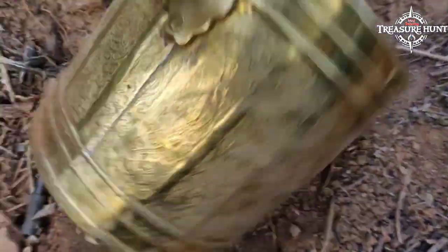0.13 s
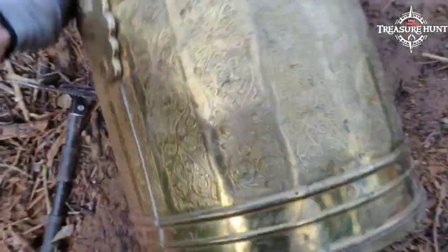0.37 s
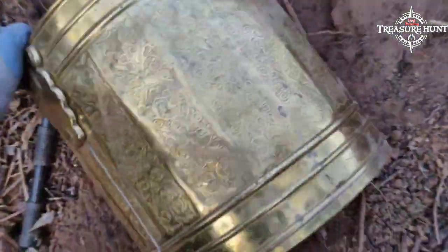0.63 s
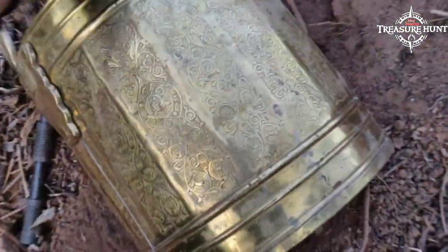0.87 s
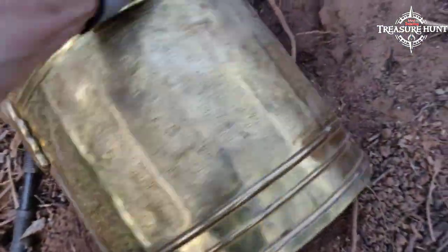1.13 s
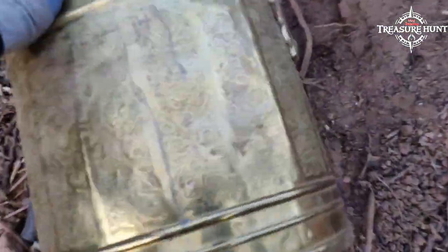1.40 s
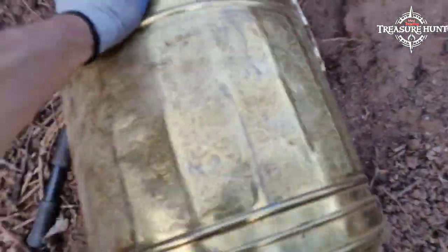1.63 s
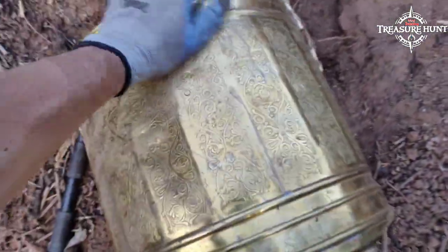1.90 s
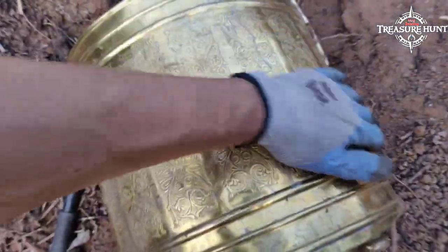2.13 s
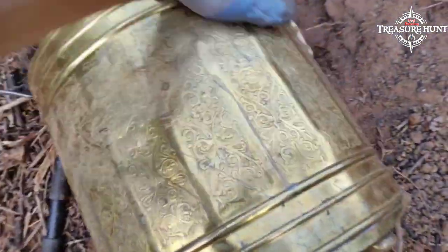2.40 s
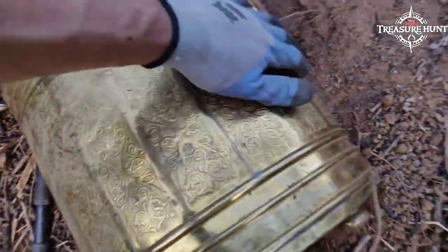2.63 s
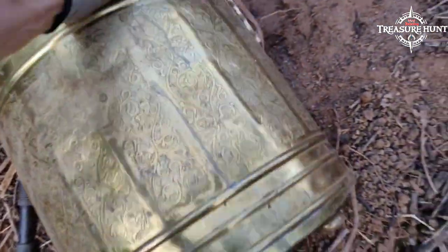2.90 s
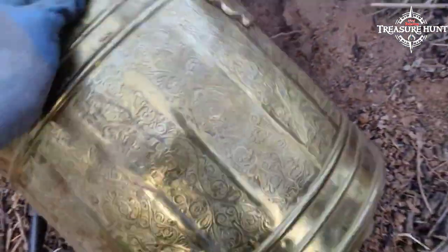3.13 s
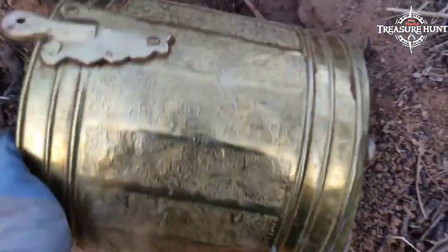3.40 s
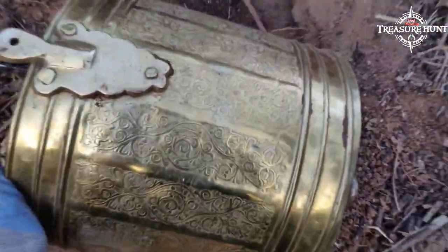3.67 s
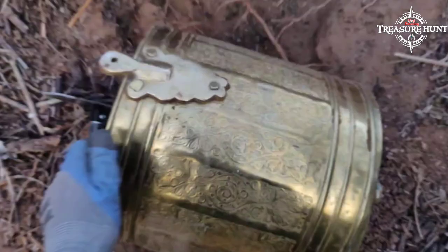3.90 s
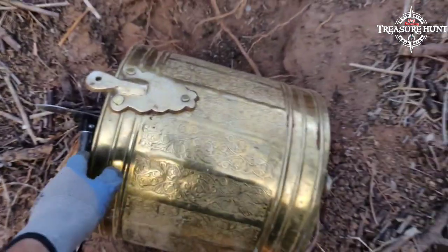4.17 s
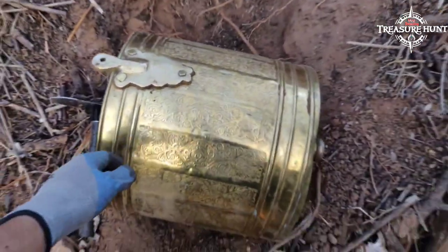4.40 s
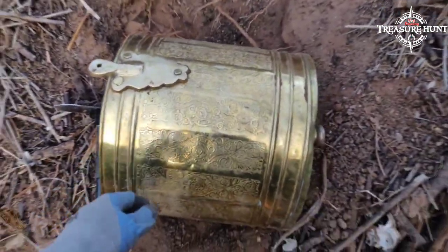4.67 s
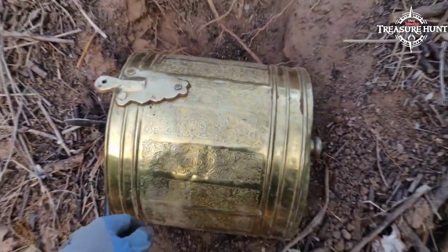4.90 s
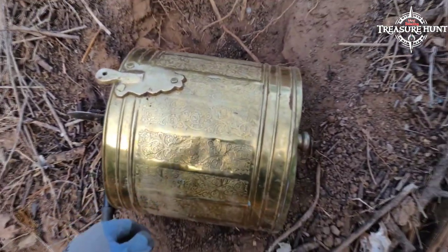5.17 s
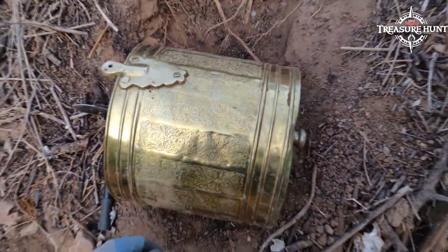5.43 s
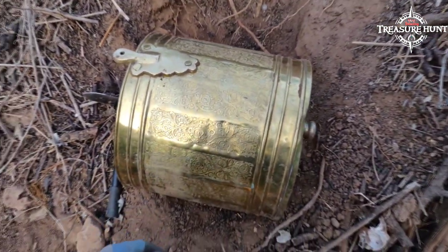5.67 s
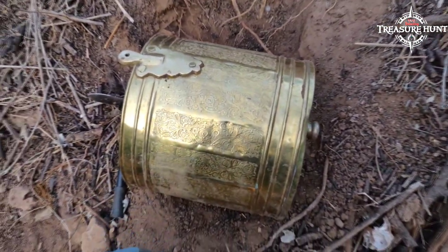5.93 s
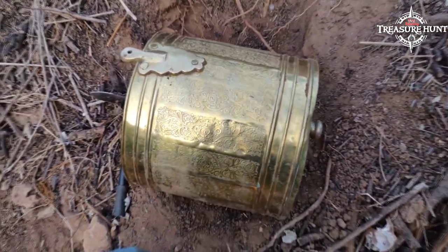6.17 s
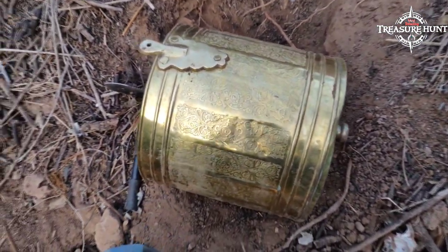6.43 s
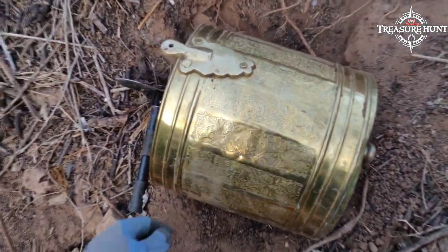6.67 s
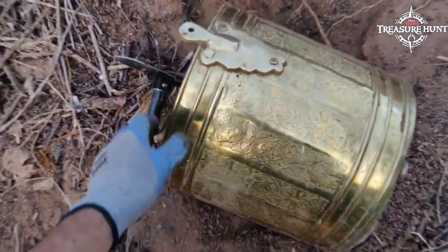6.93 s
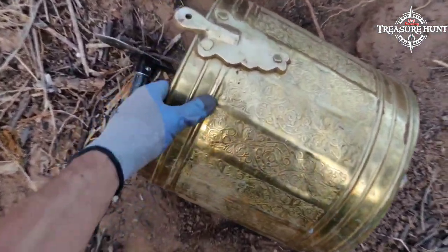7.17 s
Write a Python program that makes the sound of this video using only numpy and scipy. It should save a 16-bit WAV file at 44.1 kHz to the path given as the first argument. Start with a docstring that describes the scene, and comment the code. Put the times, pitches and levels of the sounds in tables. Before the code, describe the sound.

Hollow metal clunks, gritty scraping and glove rubs with wind thumps, fading after four seconds to soft distant rushing and tiny litter ticks.

```python
"""A distant rush of water or leaves goes on to the left, heard by a two-port microphone close to the action.
From the start gloved hands roll a hollow brass drum over dry, gritty, twiggy ground: grit and knocks ring its modes,
hardest near 0.7 and 1.5 s, while the glove hisses over the embossing, twigs snap and gusts thump the ports.
After a lull near 2.2 s it rocks and knocks again, single wall modes singing out between 3 and 3.5 s.
From about 4.5 s the rush and ticking litter are left, with a few faint knocks and snaps."""
import sys
import numpy as np
from scipy import signal
from scipy.fft import rfft, irfft
from scipy.io import wavfile
from scipy.ndimage import uniform_filter1d, minimum_filter1d

SR = 44100
rng = np.random.default_rng(int(sys.argv[2]) if len(sys.argv) > 2 else 0)


def dump_mix(stems):
    """Bounce the given channels to the path in sys.argv[1] as a 16-bit WAV at rate SR."""
    frames = np.atleast_2d(stems).T  # one column per channel
    limited = np.clip(frames, -1, 1)  # hard clip at full scale
    pcm = np.round(limited * 32767).astype(np.int16)
    wavfile.write(sys.argv[1], SR, pcm)


def undo_db(level):
    """Turn decibels back into plain size, where 20 dB means ten times bigger."""
    steps = np.asarray(level, float) / 20
    return 10 ** steps


N = 322371
T = np.arange(N) / SR  # time in seconds
MS = np.arange(0, N / SR + .002, .001)  # a grid of milliseconds, in seconds
PORTS = np.array([[1], [-1]])  # left, right

# The shell moves as body, wall and rim. Each row: lowest mode in Hz, highest mode in Hz,
# level in dB (against the strong modes) and t60 in seconds of the many faint modes between the strong ones.
PARTS = [(161, 466, -0.5, 0.11), (456, 1395, -2.5, 0.14), (1190, 4000, 12, 0.79)]
# Knocks on the shell. Each row: start in seconds, wall peak in dB, rim above wall in dB,
# favoured pitch in Hz, t60 in seconds of the damping by the grip.
KNOCKS = [(0.226, -27, -1.5, 623, 0.25), (0.62, -21.5, -29, 643, 0.67), (0.661, -11.5, 4.5, 1230, 0.28),
          (0.677, -4, -27, 644, 0.15), (0.923, -30.5, 7.5, 600, 1), (1.287, -40.5, 9.5, 690, 0.4),
          (1.454, -9.5, -7.5, 724, 0.57), (1.501, 1.5, -9, 713.5, 0.36), (1.512, -11, -8, 729, 0.43),
          (1.54, -5.5, -36, 790, 0.4), (1.817, -22, -11, 724, 0.63), (2.169, -32, -1, 910, 1),
          (2.547, -35.5, 4, 886, .2), (2.572, -23.5, -13, 503, 0.36), (2.638, -23, -8, 753, 0.15),
          (2.892, -37, 4, 670, 0.33), (2.944, -38, 2.5, 900, 0.14), (3.018, -24, -17, 556, 0.6),
          (3.052, -17, -7, 700, 0.11), (3.082, -15.5, -9, 704, 0.58), (3.123, -34, -26, 713, 0.33),
          (3.354, -13, -5, 1100, 0.9), (3.39, -13.5, -7.5, 947, 0.16), (3.409, -13.5, -23, 996, 0.48),
          (3.463, -20.5, -28, 980, 0.44), (3.515, -23, -17, 500, 0.62), (4.21, -39, -5, 597, 0.36),
          (4.597, -45, -18, 504, 0.29), (6.434, -45.5, -3, 452, 0.4), (6.611, -40, -19, 646, 0.4),
          (6.725, -40.5, -22, 556, 0.53), (7.165, -45, -12, 463, 0.4)]


def unit(x):
    """Scale to rms 1."""
    return x / np.sqrt(np.mean(x ** 2))


def along(table, hz):
    """Read (Hz, value) points on a log-frequency axis."""
    points, values = np.transpose(table)
    return np.interp(np.log(hz + 1), np.log(points), values)


def colour(x, spectrum):
    """Filter by a (Hz, dB) spectrum; white noise of rms 1 keeps rms 1."""
    gain = undo_db(along(spectrum, np.fft.rfftfreq(N, 1 / SR)))
    return irfft(rfft(x) * unit(gain), N)


def band(x, lo_hz, hi_hz):
    """Steep causal band-pass that leans towards its low edge, as soft contacts do."""
    steep = signal.butter(3, [lo_hz, hi_hz], "band", fs=SR, output="sos")
    lean = signal.butter(1, 1400., fs=SR, output="sos")
    return signal.sosfilt(np.vstack([steep, lean]), x)


def scatter(count, lo_hz):
    """Noise at both ports, less alike at higher pitch."""
    mid, side = rng.standard_normal((2, count))
    return mid + min(lo_hz / 670.0, 1) * side * PORTS


def walk(rate):
    """Random levels held 1 / rate seconds and slewed twice; rms 1."""
    k = int(SR / rate)
    held = np.repeat(rng.standard_normal(N // k + 1), k)
    slewed = uniform_filter1d(uniform_filter1d(held, k), k)
    return unit(slewed[:N])


def grains(spread_db, channels):
    """Noise whose samples have long-tailed sizes: grit cracking; rms 1."""
    return unit(rng.standard_normal((channels, N)) * undo_db(spread_db * rng.exponential(size=N)))


def bursts(times, peak_db, t60):
    """Envelope that jumps at each time and dies away."""
    out = np.zeros(N)
    for s, db, fall in zip(times, peak_db, t60):
        span = slice(int(s * SR), int((s + .3) * SR))
        out[span] += undo_db(db - 60 * (T[span] - s) / max(fall, .001))
    return out


def pan(x, db):
    """Share between the ports by a left-minus-right level."""
    return x * undo_db(np.array([db, -db]).reshape(2, -1) / 2)


def swells(full, db, rise, hold, fall):
    """Power of each event every millisecond: up to its level at full, hold, fall; slopes in s per 20 dB, at least 3 ms."""
    full, db, rise, hold, fall = (np.reshape(v, (-1, 1)) for v in (full, db, rise, hold, fall))
    before = (full - MS) / np.maximum(rise, .003)
    after = (MS - full - hold) / np.maximum(fall, .003)
    away = np.maximum(before, after)
    return undo_db(db - 20 * np.clip(away, 0, 8)) ** 2


def total(power, lag=0.):
    """Joint gain of events over time."""
    return np.interp(T - lag, MS, np.sqrt(power.sum(axis=0)))


def blend(power, values):
    """A value of each event, led by whichever is loudest."""
    return np.interp(T, MS, values @ power / power.sum(axis=0))


def rush():
    """Far rushing: noise partly common to the ports, left first, its level flickering more below 900 Hz."""
    # Each row: Hz, relative level in dB per Hz.
    rush_spectrum = [(53, -35), (90, -19), (209, -10), (243, -6.5), (295, -7.5), (343, -2), (426, 0.5),
                     (907, -2.5), (1080, -5), (2250, -12), (3610, -20.5), (6910, -22.5), (8760, -31.5),
                     (14700, -32.5), (15700, -31)]
    # Each row: Hz, share of the power common to both ports.
    alike = [(60, 0.41), (300, 1), (1000, 0.66), (3000, 0.083), (6000, 0.1), (12000, .1)]
    hz = np.fft.rfftfreq(N, 1 / SR)
    share = np.clip(along(alike, hz), 0, 1)
    common, left, right = rfft(rng.standard_normal((3, N)))
    lag = np.exp(-2j * np.pi * hz * 0.00039)  # the right port hears it 0.39 ms later
    together = np.sqrt(share) * common * np.array([lag ** 0, lag])
    apart = np.sqrt(1 - share) * np.array([left, right])
    both = (together + apart) * undo_db(along(rush_spectrum, hz))
    out = 0
    for centre_hz in 60 * 2 ** np.arange(0, 8.5, .5):
        # overlapping bands, half an octave to either side
        weight = np.clip(1 - np.abs(np.log2(hz / centre_hz + 1e-9)) * 2, 0, 1)
        flicker_db = 2.5 if centre_hz < 900 else 1.
        out = out + irfft(both * weight, N) * undo_db(flicker_db * walk(24))
    return unit(out) * undo_db(-49 + .6 * walk(3))


def litter():
    """Dry litter settles all around in faint dull ticks: random hits with short tails of band-passed noise."""
    ticks_per_s, tick_db, t60_s = 19, -51, 0.033
    hits = (rng.random(N) < ticks_per_s / SR) * undo_db(tick_db + 1.5 * rng.standard_normal(N))
    tail = signal.lfilter([1], [1, -undo_db(-60 / (t60_s * SR))], hits)
    return tail * unit(band(scatter(N, 640.0), 1100.0, 3200.0))


def slap():
    """Air slaps mostly one port at a time: each a brief swing of its membrane."""
    # Each row: time in seconds half a swing before the middle, peak in dB (about the mean of the ports),
    # length of a swing in seconds, left minus right in dB.
    slaps = [(0.713, -28, 0.013, 24), (0.802, -11.5, 0.0087, 24), (1.015, -30, 0.019, 22),
             (1.435, -23, 0.012, 24), (1.451, -15.5, 0.0094, 24), (2.468, -33.5, 0.009, 24),
             (2.75, -32, 0.01, -24), (2.834, -15, 0.0082, 15), (2.871, -16, 0.011, 17),
             (3.114, -19, 0.013, 22), (3.139, -12, 0.007, 28), (3.148, -22, 0.0059, -27),
             (3.165, -14, 0.0084, 24), (3.17, -14, 0.0072, -24), (3.18, -14.5, 0.0107, -24),
             (3.194, -14, 0.0072, 24), (3.23, -16, 0.0113, 24), (3.276, -25, 0.012, 9),
             (3.519, -31, 0.016, 24), (4.172, -35, 0.0096, -24), (4.182, -33, 0.01, -26),
             (4.211, -31, 0.0078, -26), (4.238, -45, 0.0103, -24), (4.253, -35, 0.015, -7)]
    out = np.zeros((2, N))
    for s, db, length, side_db in slaps:
        span = slice(int((s - .04) * SR), int((s + .06) * SR))
        u = (T[span] - s) / length - .5
        swing = -undo_db(db) * np.cos(2 * np.pi * u + 0.33) * np.exp(-(u / 0.41) ** 2)
        share = 2 / (1 + undo_db(-side_db * PORTS))
        out[:, span] += np.sign(-side_db) * swing * share  # the favoured port sets the polarity
    return out


def wind():
    """Gusts thump the ports: low fluttering rumble, its noise unrelated at the two, that veers from side to side."""
    # Each row: Hz, relative level in dB per Hz.
    gust_spectrum = [(10, 4), (25, -11), (60, -6.5), (100, -16), (180, -14.5), (350, -63.5)]
    # Each row: time full level is reached, in seconds, level in dB, hold in seconds, fall in seconds per 20 dB,
    # left minus right in dB.
    gusts = [(0.0, -55, .01, 0.39, 10), (0.53, -57, .01, 0.155, -9), (0.664, -40, 0.13, .05, 1),
             (0.83, -38, 0.24, 0.16, 7), (1.3, -52, .05, .2, 3), (1.59, -38, 0.011, 0.49, 2),
             (2.44, -48, 0.068, 0.052, 16), (2.723, -43.5, 0.12, .1, -14), (2.83, -39.5, 0.12, 0.088, 13),
             (3.14, -36, 0.15, .1, 8), (3.38, -46.5, 0.28, .25, -9), (4.047, -51.5, .01, .1, -11),
             (4.14, -50.5, 0.15, 0.085, -12)]
    calm_db, calm_pan_db, veer_db = -60.5, -7, 10.5
    full, db, hold, fall, pan_db = np.transpose(gusts)
    calm = undo_db(calm_db) ** 2 + 0 * MS
    power = np.vstack([swells(full, db, 0.82 * fall, hold, fall), calm])
    side_db = blend(power, np.append(pan_db, calm_pan_db)) + veer_db * walk(6.8)
    flutter_db = 3.5 * np.array([walk(25), walk(25)])
    rumble = colour(rng.standard_normal((2, N)), gust_spectrum)
    return pan(rumble * total(power) * undo_db(flutter_db), side_db)


def wipe():
    """Glove and litter stroke the metal in dense scratches, with sharper snaps of twigs and grit on top."""
    # Each row: Hz, relative level in dB per Hz; the hiss, then the higher fizz.
    hiss_spectrum = [(2500, 0.5), (4000, -6), (5000, -2.5), (7000, -1.5), (8200, -6), (9500, -21),
                     (11000, -35.5)]
    fizz_spectrum = [(8000, -11), (10000, -7.5), (12500, -2), (14500, 3), (15700, -3.5)]
    # Strokes. Each row: time full level is reached, in seconds, hiss in dB, hold in seconds,
    # fall in seconds per 20 dB, left minus right in dB.
    strokes = [(0.0, -62, .01, .2, -3), (0.218, -54, 0.0092, .25, 3), (0.443, -51, 0.066, 0.083, .3),
               (0.574, -53, .05, .1, 3), (0.666, -26.5, .003, 0.039, 3.3), (0.713, -44.5, .1, .06, 0.5),
               (0.857, -42.5, 0.009, 0.035, -1), (0.933, -47, 0.022, .03, 1), (1.025, -57, 0.15, 0.52, 0),
               (1.33, -49.5, 0.033, 0.14, 1.5), (1.427, -43.5, 0.098, 0.056, -1.5),
               (1.6, -57.5, 0.27, 0.13, 0), (2.111, -48, .19, 0.18, 0), (2.473, -43.5, 0.079, 0.076, 1),
               (2.69, -48, 0.073, 0.088, 0.5), (2.869, -44.5, 0.054, 0.061, 0.5),
               (3.16, -52.5, 0.021, 0.4, 2), (3.35, -49.5, 0.084, 0.13, 1), (3.522, -36, 0.023, 0.041, 2.5),
               (3.594, -54, .12, .1, 1), (3.761, -45.5, .003, 0.053, 0), (3.814, -52, 0.081, 0.26, -0.5),
               (4.093, -63, .01, 0.53, -2)]
    # Twigs and grit. Each row: start in seconds, rough hiss peak in dB, fizz rms at the onset in dB, t60 in seconds.
    snaps = [(0.3591, -39, -56, 0.03), (0.6479, -27, -46, 0.056), (0.661, -31, -32, 0.046),
             (0.9207, -32, -50, 0.036), (1.052, -36, -83, 0.02), (1.1757, -38, -63, 0.03),
             (1.456, -21, -58, 0.036), (1.6097, -33, -49, 0.027), (1.8657, -42, -56, 0.037),
             (2.836, -55, -52.5, 0.019), (3.176, -35, -61, 0.033), (3.3538, -39, -55, 0.035),
             (3.5014, -42, -54, 0.03), (3.5159, -27, -46, 0.067), (3.6755, -41, -47, 0.06),
             (3.7264, -44, -44, 0.033), (3.745, -48, -40, 0.065), (3.8404, -43, -47, 0.15),
             (3.926, -40, -62.5, 0.036), (4.0881, -42, -69, 0.034), (4.148, -38.5, -75, 0.057),
             (4.5471, -50, -75, 0.03), (4.7346, -44, -67, 0.03), (5.7993, -37, -72, 0.024),
             (7.132, -39, -70, 0.033)]
    full, db, hold, fall, pan_db = np.transpose(strokes)
    power = swells(full, db, 0.77 * fall, hold, fall)
    brush = total(power) * undo_db(1.8 * walk(15))
    scratch = grains(1.1, channels=2)
    # each port also hears the other's scratches, faint and one sample late
    scratch = unit(scratch + 0.11 * np.roll(scratch[::-1], 1, axis=1))
    s, snap_db, snap_fizz_db, t60 = np.transpose(snaps)
    snap_rms_db = snap_db - 20 * np.log10(3)  # noise peaks at about three times its rms
    hiss = (brush + bursts(s, snap_rms_db, t60)) * colour(scratch, hiss_spectrum)
    fizz = (brush * undo_db(-8.5) + bursts(s, snap_fizz_db, t60)) * colour(scratch, fizz_spectrum)
    return pan(hiss + fizz, blend(power, pan_db))


def rolling():
    """Gains of body, wall and rim while the shell rolls; the body answers later, and more to dull contact."""
    # Rolls over grit. Each row: time of the peak, in seconds, wall drive in dB, rise and fall in seconds per 20 dB,
    # rim above wall in dB.
    rolls = [(0.0, -49, .1, 0.46, -9), (0.22, -37.5, 0.13, .25, -2.5), (0.46, -43, 0.5, 0.65, 2),
             (0.678, -17, 0.056, 0.052, -4.3), (0.74, -28.5, 0.057, 0.29, -3.5),
             (0.93, -32.5, 0.067, 0.1, 0.5), (1.23, -42, 0.59, 0.7, 3.5), (1.44, -34, 0.31, 0.12, -4),
             (1.465, -16, 0.033, 0.11, -10.5), (1.521, -13.5, 0.09, 0.13, -18),
             (1.68, -38.5, 0.081, 0.49, -8), (1.84, -36.5, 0.17, 0.089, -13), (2.22, -42, 0.13, 0.8, -.4),
             (2.57, -33.5, 0.17, 0.048, -13), (2.64, -33, 0.059, 0.082, -13.5), (2.72, -42, 0.17, 0.42, -4),
             (2.89, -41, 0.084, 0.23, -16), (3.031, -31, .03, 0.17, -17), (3.1, -29, 0.049, 0.12, -8.5),
             (3.22, -38.5, 0.26, 0.5, -3.5), (3.32, -34, .2, 0.17, -8), (3.365, -21, 0.02, 0.14, -10),
             (3.525, -21, 0.039, 0.11, -1), (3.569, -28.5, 0.069, 0.16, -10),
             (3.75, -42.5, 0.12, 0.39, 3.5), (4.12, -49.5, 0.52, 0.4, -3), (4.45, -59, 0.25, 0.19, -4)]
    peak, db, rise, fall, rim_db = np.transpose(rolls)
    power = swells(peak, db, rise, 0, fall)
    body_db = -9.5 - 0.57 * rim_db  # against the wall
    body = total(power * undo_db(body_db)[:, None] ** 2, lag=0.031)
    rim = total(power * undo_db(rim_db)[:, None] ** 2)
    return body, total(power), rim


def hum():
    """The four deepest modes, kept alive by small pushes so that they waver, until a hand or the ground stills them."""
    # Pitches of the four modes in Hz.
    hum_hz = (112, 140.6, 199.6, 234.3)
    # Each row: time full level is reached, in seconds, pitch in Hz near that of its mode, level in dB,
    # hold in seconds, fall in seconds per 20 dB.
    hums = [(0.683, 112, -35, 0.2, 0.84), (1.136, 112, -36.5, .01, 0.52), (1.498, 112, -33, 0.22, 0.52),
            (2.56, 112, -36.5, .07, 0.17), (2.944, 112, -38.5, 0.11, .15), (3.366, 112, -27.5, .05, 0.22),
            (3.586, 112, -32.5, .01, 0.2), (0.0, 142, -59, .3, .3), (0.728, 142, -19.5, 0.097, 0.026),
            (0.88, 142, -30.5, .09, 0.11), (1.134, 142, -40, .01, 0.22), (1.492, 142, -21, .04, .08),
            (1.735, 142, -35, .01, .1), (1.836, 142, -30.5, .01, .22), (2.538, 142, -28.5, .01, 0.055),
            (2.67, 142, -42.5, 0.004, .9), (3.018, 142, -31.5, .01, .25), (3.4, 142, -35.5, 0.16, .1),
            (3.633, 142, -42.5, 0.0087, 0.28), (0.68, 198, -28, .01, .12), (1.502, 198, -16, 0.025, 0.025),
            (2.203, 198, -44, 0.0079, 0.031), (2.555, 198, -28, 0.0092, .07),
            (2.655, 198, -28, 0.0085, 0.029), (2.82, 198, -41, 0.012, 0.19), (3.024, 198, -26, 0.1, 0.043),
            (3.368, 198, -23, .02, 0.12), (3.396, 198, -15, 0.014, 0.08), (3.577, 198, -27, .01, 0.032),
            (0.678, 234, -29, 0.066, 0.088), (0.85, 234, -39, .01, 0.3), (1.46, 234, -44, 0.054, .1),
            (1.607, 234, -20.5, 0.011, 0.11), (1.786, 234, -36.5, .01, 0.14), (2.222, 234, -52, .01, .1),
            (2.68, 234, -39, 0.13, 0.12), (3.14, 234, -35, 0.096, 0.058), (3.406, 234, -31, .2, .12)]
    full, near_hz, db, hold, fall = np.transpose(hums)
    power = swells(full, db, 0.025, hold, fall)
    mode = np.abs(near_hz[:, None] - hum_hz).argmin(axis=1)
    rolled = undo_db(-19.5) * rolling()[1]  # rolling keeps every mode faintly alive
    out = 0
    for k, hz in enumerate(hum_hz):
        wandering_hz = hz * (1 + 0.01466 * walk(12))
        phase = 2 * np.pi * np.cumsum(wandering_hz) / SR + 0.18 * PORTS
        level = np.hypot(total(power[mode == k]), rolled) * undo_db(1.62 * walk(12.))
        out = out + level * np.sqrt(2) * np.sin(phase)
    return pan(out, 0.92)


def sing():
    """One wall mode at a time rings clear, a wavering sine, while the shell rocks on its edge."""
    # Each row: time full level is reached, in seconds, pitch in Hz, level in dB, hold in seconds,
    # fall in seconds per 20 dB.
    sung = [(3.059, 714, -29, 0.0087, .02), (3.09, 716.4, -29, 0.083, 0.033),
            (3.391, 966, -22, 0.0075, 0.025), (3.45, 995, -32.5, 0.064, .03)]
    out = 0
    for full, hz, db, hold, fall in sung:
        phase = 2 * np.pi * hz * (T - full) + 0.35 * PORTS
        level = total(swells(full, db, 0.0077, hold, fall)) * undo_db(2.1 * walk(40.1))
        out = out + level * np.sqrt(2) * np.sin(phase)
    return out


def ring(lo_hz, hi_hz, faint_db, faint_t60, favoured_hz, held_t60):
    """Response of one part of the shell at both ports; the struck spot favours modes near one pitch, a hand damps all."""
    # Strong modes of the shell. Each row: pitch in Hz, relative level in dB, t60 in seconds before the hand's damping.
    modes = [(267.3, 0.5, 0.6), (310.7, -5.5, 0.4), (323, -0.5, 1), (361.3, -2.5, 0.25), (411, -1, 0.99),
             (505.4, -6, 0.22), (560.7, -1.5, 0.19), (608.6, -4, 0.63), (632, 2, 0.07), (687, 3, 0.2),
             (724, 0, 0.32), (763, -6, 0.25), (780, 1.5, 0.17), (836, -15, 0.61), (864.6, -0.5, 0.18),
             (972, -2, 0.26), (996, -7, .4), (1100, -10, 0.49), (1225, -9.5, 0.32), (1390, -6, 0.26),
             (1470, -2.5, 0.25), (1583, 5, 0.3), (1550, -13, 0.11), (1768, 3.5, 0.15)]
    t = T[:SR // 2]
    hz, db, t60 = np.array([m for m in modes if lo_hz <= m[0] < hi_hz]).T[:, :, None]
    octaves_off = np.log2(hz / favoured_hz)
    db = db + 17 * np.exp(-(octaves_off / .06) ** 2)
    swing = undo_db(db - 60 * t / t60) * np.exp(2j * np.pi * (hz * t + rng.random(hz.shape)))
    # higher modes arrive less alike at the two ports
    turn = hz / 13000.0 + hz / 6300.0 * rng.standard_normal(hz.shape)
    strong = np.array([np.sum(swing * np.exp(1j * side * turn), axis=0).real for side in (-1, 1)])
    faint = band(scatter(len(t), lo_hz) * undo_db(-60 * t / faint_t60), lo_hz, hi_hz)
    contact = 1 - np.exp(-t / 0.00017)  # contact builds up with a time constant of 0.17 ms
    both = unit(strong) + undo_db(faint_db) * unit(faint)
    return band(both * contact * undo_db(-60 * t / held_t60), 0.59 * lo_hz, min(hi_hz, 2700.))


def roll():
    """Grit under the rolling shell pushes at random and keeps body, wall and rim sounding."""
    # each stone bites at once and lets go over a few milliseconds
    bites = (rng.random(N) < 400. / SR) * undo_db(3.2 * np.minimum(rng.exponential(size=N), 3.))
    bite_power = signal.lfilter([1], [1, -np.exp(-1 / (0.01 * SR))], bites ** 2)
    grit = unit(np.sqrt(bite_power + 0.27))
    for s in np.transpose(KNOCKS)[0]:
        # the shell tips off the ground just before it knocks, and the grit falls quiet
        grit = grit * (1 - .65 * np.clip((T - s) / .02 + 1, 0, 1) * (T < s))
    out = np.zeros((2, N))
    for (lo_hz, hi_hz, _, _), gain in zip(PARTS, rolling()):
        # strong modes only, no favoured pitch
        response = ring(lo_hz, hi_hz, -np.inf, 1, favoured_hz=1, held_t60=0.62)
        response = response / np.sqrt(np.sum(response ** 2) / 2)
        push = rng.standard_normal((1, N)) * grit * gain
        ringing_db = -4. if lo_hz < 1000 else -16.  # the rim rings less
        out += undo_db(ringing_db) * signal.fftconvolve(push, response)[:, :N]
        out += undo_db(-4.0) * gain * grit * unit(band(scatter(N, lo_hz), lo_hz, hi_hz))
    return out


def knock():
    """Knocks set body, wall and rim ringing at once, damped by the grip."""
    out = np.zeros((2, N + SR))
    for s, wall_db, rim_db, hz, held_t60 in KNOCKS:
        peaks_db = wall_db + np.array([-11, 0, rim_db])  # body, wall, rim
        for part, db in zip(PARTS, peaks_db):
            response = ring(*part, hz, held_t60)
            start = int(s * SR)
            out[:, start:start + response.shape[1]] += undo_db(db) * response / np.abs(response).max()
    return out[:, :N]


def scene():
    """All sources at the two ports."""
    return rush() + litter() + slap() + wind() + wipe() + hum() + sing() + roll() + knock()


def top_cut(x):
    """Nothing passes above the cut-off."""
    return signal.sosfilt(signal.butter(12, 16170, fs=SR, output="sos"), x)


def record(dry):
    """A limiter that looks a few milliseconds ahead holds the loudest knocks down."""
    reach = SR // 200  # 5 ms
    gain = np.minimum(1, .95 / (np.abs(dry).max(axis=0) + 1e-9))
    gain = uniform_filter1d(minimum_filter1d(gain, size=2 * reach), size=reach)
    return top_cut(dry * gain)


dry = scene()
out = record(dry)
dump_mix(out)
```